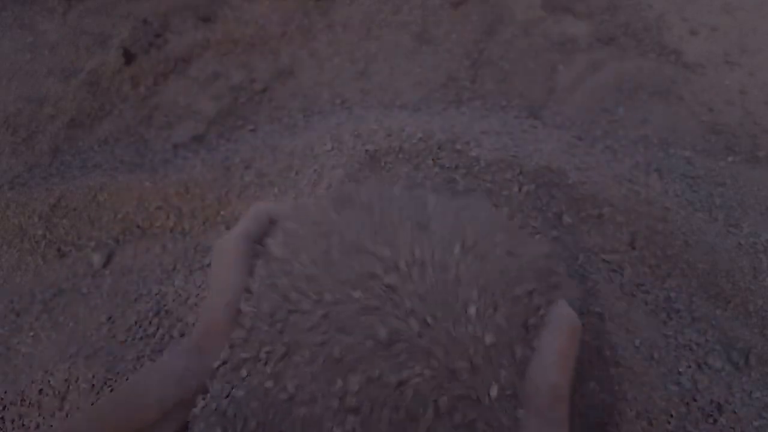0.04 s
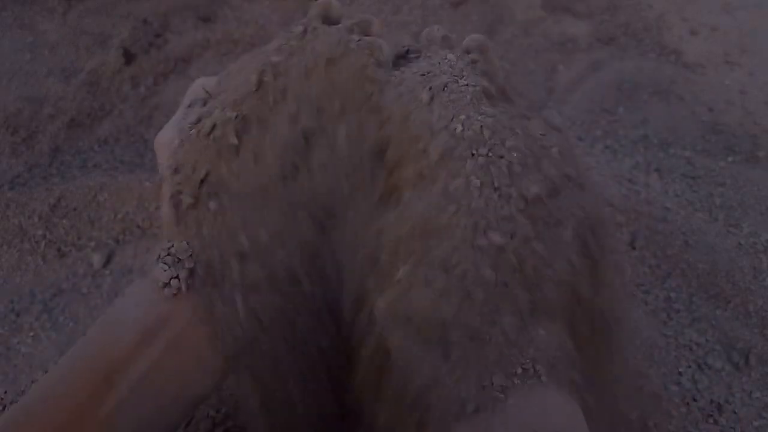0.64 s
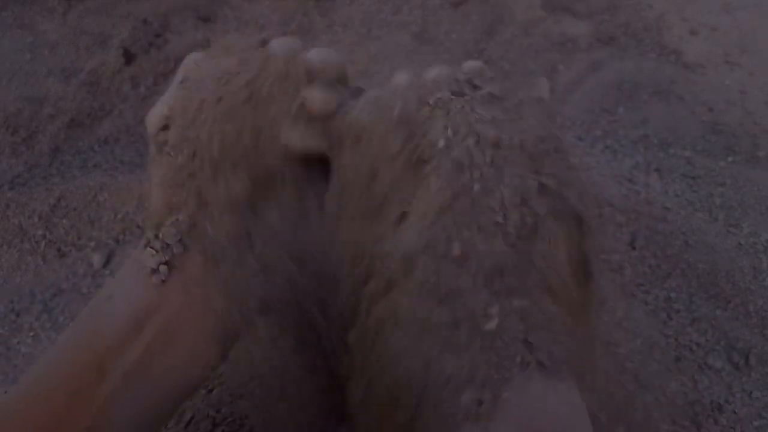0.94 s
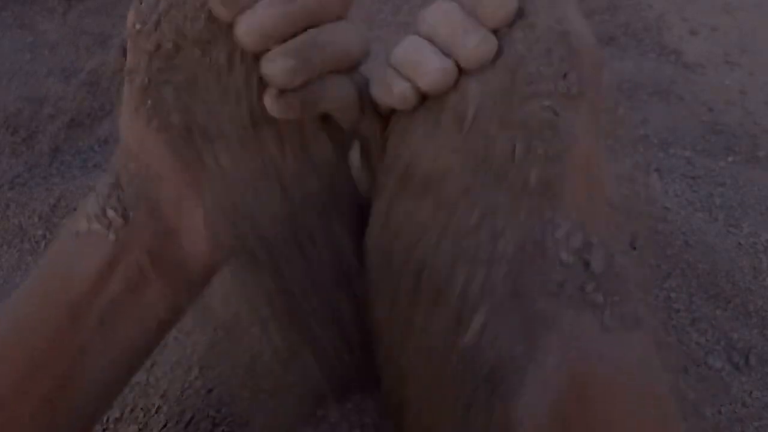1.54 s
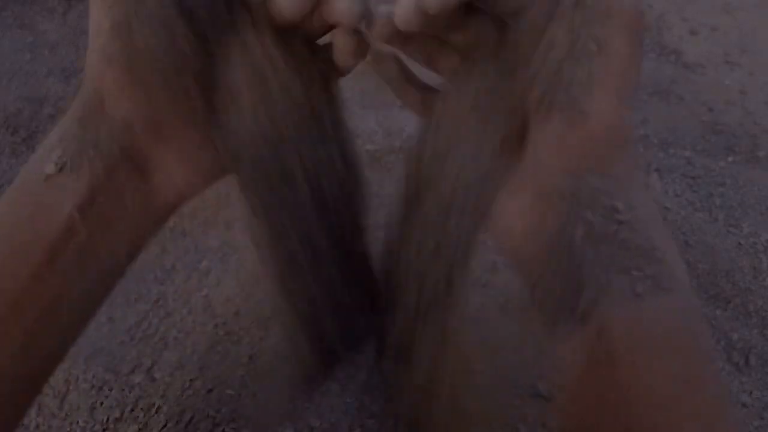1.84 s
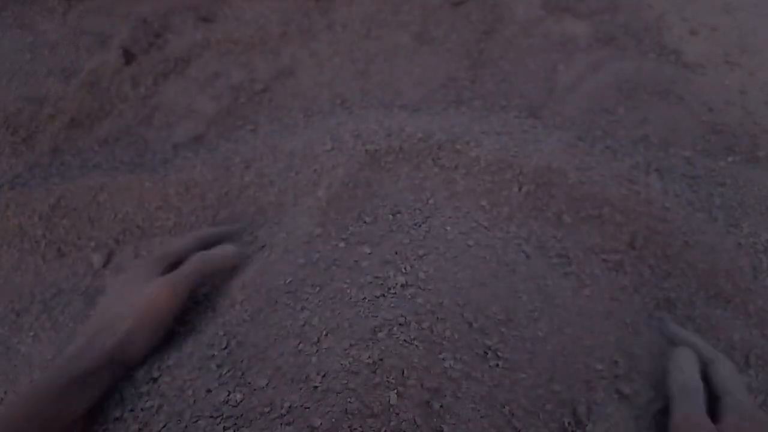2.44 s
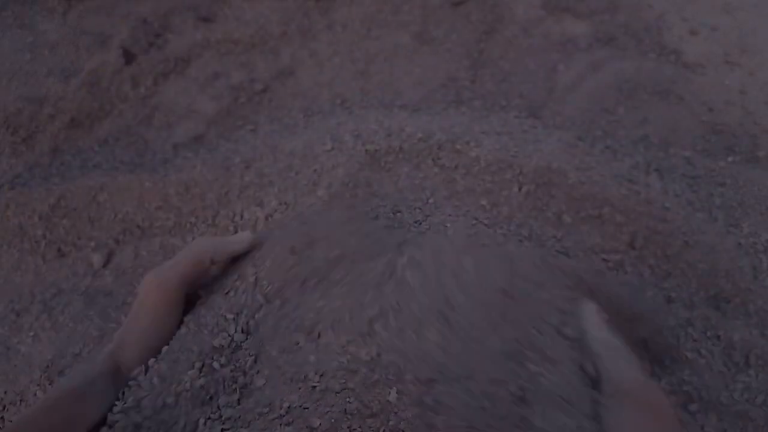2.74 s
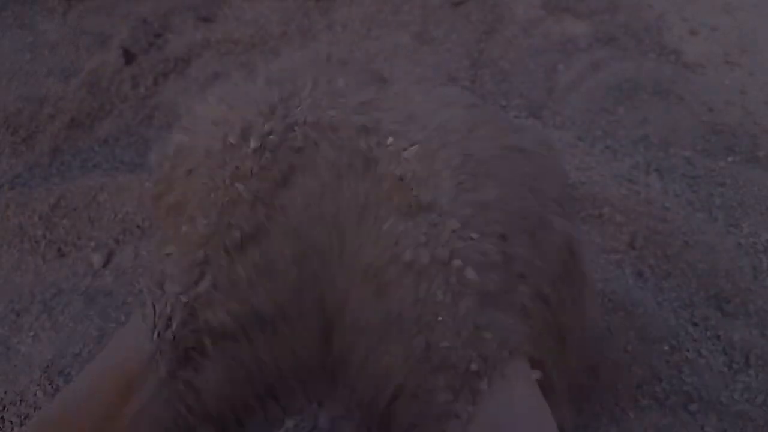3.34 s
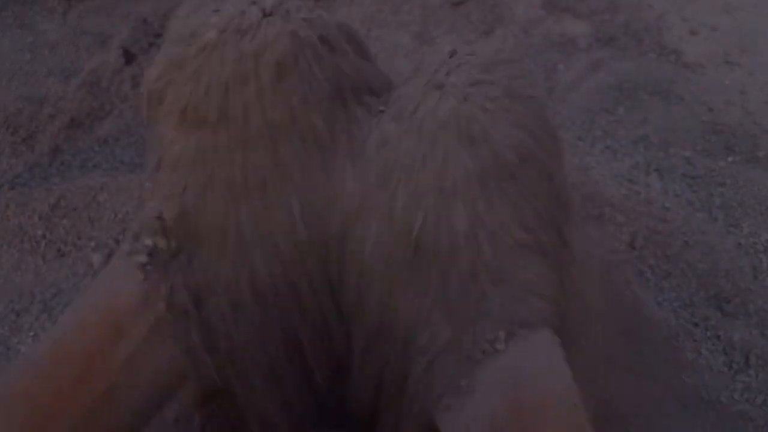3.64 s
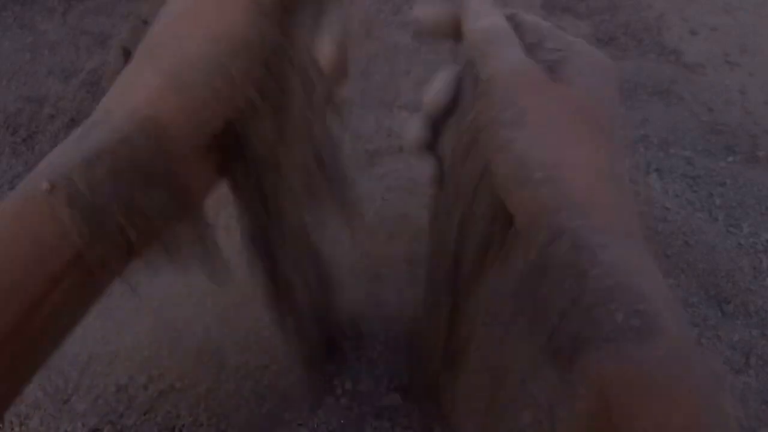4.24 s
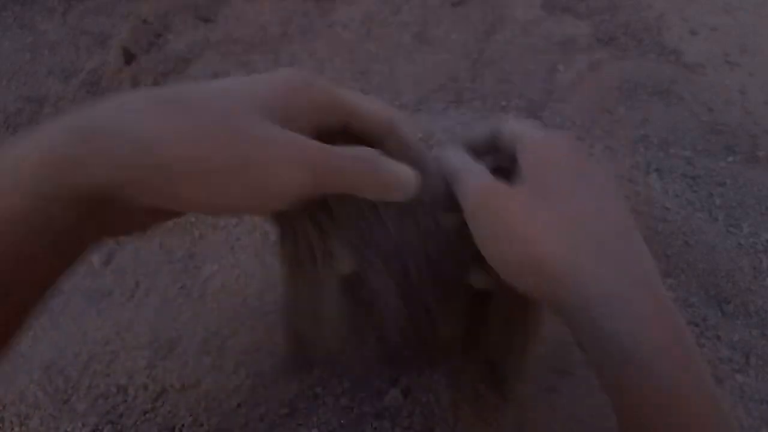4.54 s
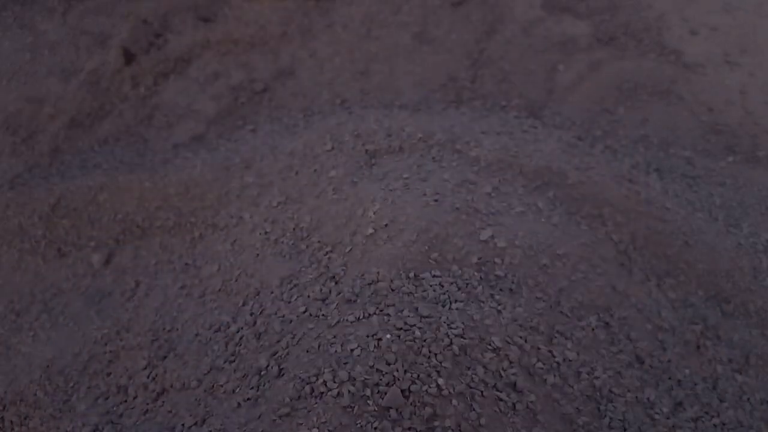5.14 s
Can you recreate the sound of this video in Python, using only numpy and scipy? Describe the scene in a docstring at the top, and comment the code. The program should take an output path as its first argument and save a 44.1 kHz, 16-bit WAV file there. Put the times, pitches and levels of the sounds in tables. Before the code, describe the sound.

Outdoors and close up, hands push into dry, gritty sand with a soft crunch right at the start. From about 0.2 seconds sand streams onto the heap in a fine, crackling hiss that grows until it cuts off near 2.1 seconds. Grains rub over the palms and small stones tick sharply, most clearly around 1.5 seconds. After a brief lull, the fingers dig in again with a firmer crunch from 2.4 to 3 seconds. A second pour starts near 3.2 seconds, peaks around 3.8 with a sharp tick and soft, dull thuds of landing clumps, and trickles out after 4.7. Short sandy scrapes and a light thud follow from 5 to 5.3 seconds. Underneath runs a low wash of distant traffic with faint machine hums. One far engine drones, speeding up and easing off until about 3.3 seconds; another comes in near 3.6 and fades after 5.1.

```python
"""Dry, gritty sand, scooped from a heap by two hands and poured back twice, outdoors and close up.
Falling grains hiss and crackle as many tiny rings; packed sand crunches in small slips under the
fingers and rubs over hollow palms. Small stones tick, and a heavy handful lands with a soft rumble.
Far off, two engines drone and change speed over faint machine hums and a low wash of traffic."""
import sys
import numpy as np
from scipy import signal
from scipy.fft import rfft, irfft
from scipy.io import wavfile

SR = 44100
rng = np.random.default_rng(int(sys.argv[2]) if len(sys.argv) > 2 else 0)


def digitize_waveform(pressure):
    """Quantize a signal to 16-bit integers and store it at the path in sys.argv[1].

    Rows of a 2-D input are taken as channels; values are limited to [-1, 1].
    """
    field = np.atleast_2d(pressure).T
    bounded = np.clip(field, -1, 1)
    quanta = np.round(bounded * 32767).astype(np.int16)
    wavfile.write(sys.argv[1], SR, quanta)


N = 232892
TIME = np.arange(N) / SR
FREQS = np.fft.rfftfreq(N, 1 / SR)

# handfuls streaming out: start/s, end of growth/s, empty/s, level/dB, growth/(dB/s)
POURS = [(0.17, 2.86, 2.082, -46, 3.5), (3.17, 3.837, 4.692, -46.5, 14)]
# fingers pushing into the heap: deepest/s, stop/s, level/dB, brightness/dB, spray level/dB
DIGS = [(0, 0.305, -58.5, -7.5, -59), (2.383, 2.387, -56, -13, -56), (2.476, 3.025, -49, -1, -56.5),
        (5.261, 5.28, -58.5, -9, -50.5)]


def pouring(stream_db, dig_db, spray_db):
    """Fine sand rains on the heap in an uneven hiss; buried hands muffle its top."""
    spectrum = [(2500, -53), (5000, -9.5), (6700, -7.5), (7600, -3), (8600, -6.5), (10000, -2.5),
                (11800, 0), (13500, -4), (15700, -9)]  # hiss: f/Hz, level/dB
    flow_db, (streaming, trickling, *_) = power_sum([stream_db, trickle(), dig_db - 13.5, spray_db])
    poured = streaming + trickling
    pan_db = poured - 3.5 * (1 - poured)
    top_db = 5.5 * poured - 2 * (1 - poured)
    rain = grains(flow_db, peak_per_s=12000, spread_db=3.6, ring_s=0.0002, top_hz=17660,
                  dust_share=0.35, thinning=0.55)
    flutter_db = 0.7 * walk(25)
    hiss = colour(rain, spectrum, band_hz=(8000, 15500))
    body = irfft(rfft(hiss) / (1 + (FREQS / 13000) ** 24), N)
    return (body + (hiss - body) * undb(top_db)) * undb(flow_db + flutter_db) * pan(pan_db)


def stream():
    """Flow in dB from the lifted hands: starts, grows, gushes, cuts off."""
    gushes = [(0.65, 0.11, 3), (1.088, 0.054, -2), (1.298, 0.093, 3), (1.875, 0.076, 4),
              (2.045, 0.062, 4.5), (4.08, 0.12, 1.3), (4.479, 0.043, -2.5)]  # lumps giving way or blocking: t/s, half length/s, flow change/dB
    levels_db = []
    for start_s, full_s, empty_s, db, growth_db_per_s in POURS:
        gate_db = envelope(start_s, empty_s, rise_db_per_s=76, fall_db_per_s=256)
        levels_db.append(db + gate_db - growth_db_per_s * np.maximum(full_s - TIME, 0))
    return power_sum(levels_db)[0] + sum(db * bump(s, half_s) for s, half_s, db in gushes)


def trickle():
    """Flow in dB of the last grains after each stream."""
    return power_sum([db - 11 + envelope(empty_s, empty_s, rise_db_per_s=256, fall_db_per_s=36)
                      for _, _, empty_s, db, _ in POURS])[0]


def digs():
    """Force in dB of each dig: a quick push that eases as the hands fill."""
    return [db + envelope(deepest_s, stop_s, rise_db_per_s=122, sag_db_per_s=6.5, fall_db_per_s=58)
            for deepest_s, stop_s, db, *_ in DIGS]


def spray():
    """Flow in dB of loose sand thrown up by the digs."""
    return power_sum([db + envelope(s, s, rise_db_per_s=133, fall_db_per_s=121)
                      for s, *_, db in DIGS])[0]


def rolling(stream_db, dig_db, spray_db):
    """Coarser grit tumbles with a lower crackle wherever sand moves."""
    spectrum = [(1200, -3.5), (2400, 1), (2950, -1), (3600, 1), (4700, 1.5), (6200, -9), (8000, -7.5),
                (14000, -9)]  # crackle: f/Hz, level/dB
    flow_db, _ = power_sum([stream_db - 10, dig_db - 20.5, spray_db - 3.5])
    crackle = grains(flow_db, peak_per_s=6000, spread_db=3, ring_s=0.00016, top_hz=10500,
                     dust_share=0.5, thinning=0.6)
    flutter_db = 0.6 * walk(30)
    return colour(crackle, spectrum, band_hz=(3200, 6500)) * undb(flow_db + flutter_db)


def crushing(stream_db):
    """Packed sand gives way in many small slips."""
    spectrum = [(150, -21), (350, 7.5), (580, 6.5), (760, -0.5), (1250, 1), (1600, 1), (2000, 0),
                (2500, -3), (3200, -6), (6000, -18)]  # crunch: f/Hz, level/dB
    force_db, bright_db = pressure(stream_db)
    slips = grains(force_db, peak_per_s=3000, spread_db=3, ring_s=0.0004, top_hz=5000,
                   dust_share=0.6, thinning=0.4)
    crunch = colour(slips, spectrum, band_hz=(1050, 1900))
    body = irfft(rfft(crunch) / (1 + (FREQS / 1000) ** 4), N)
    depth_db = 0.37 * (force_db - force_db.max()) - bright_db / 2  # a hard push moves deep sand too
    tilted = body * undb(depth_db) + (crunch - body) * undb(bright_db / 2)
    return tilted * undb(force_db + 1.33 * walk(21))


def pressure(stream_db):
    """Force and brightness in dB of the crunch; it dulls as the fingers sink."""
    squeezes = [(0.316, 0.19, -65, -11), (0.928, 0.099, -63, -9), (1.527, 0.059, -60.5, -14),
                (1.67, 0.14, -59.5, -13), (2.057, 0.077, -58, -6), (3.781, 0.15, -51, -4.5),
                (4.24, 0.1, -59.5, 9), (4.648, 0.13, -60.5, -11)]  # grips on the handful: t/s, half length/s, level/dB, brightness/dB
    dulling_db_per_s = 14
    stream_shear = (stream_db - 15, -7.5)  # force/dB, brightness/dB
    heap_creep = (np.full(N, -68), -1.5)
    parts = [stream_shear, heap_creep]
    for force_db, (deepest_s, stop_s, _, bright_db, _) in zip(digs(), DIGS):
        buried_s = np.clip(TIME, deepest_s, stop_s) - deepest_s
        parts.append((force_db, bright_db - dulling_db_per_s * buried_s))
    for s, half_s, db, bright_db in squeezes:
        parts.append((db + 10 * np.log10(bump(s, half_s) + 1e-12), bright_db))
    force_db, shares = power_sum([db for db, _ in parts])
    return force_db, sum(share * bright_db for share, (_, bright_db) in zip(shares, parts))


def grains(flow_db, peak_per_s, spread_db, ring_s, top_hz, dust_share, thinning):
    """Tiny collisions, each a short ring of its own pitch, size and place, over a hiss of dust."""
    draw = np.random.default_rng(rng.integers(2 ** 31)).random((int(peak_per_s * N / SR), 7))
    start = (draw[:, 0] * N).astype(int)
    density = undb(thinning * (flow_db - flow_db.max()))  # thin flow: fewer hits, each stands out
    hit = draw[:, 1] < density[start]
    start = start[hit]
    pitch, weight, place, *phases = draw[hit, 2:].T
    size = undb(-spread_db * np.log(weight + 0.012)) / np.sqrt(density[start])
    hz = pitch[:, None] * top_hz
    age = np.arange(64)
    index = (start[:, None] + age).ravel()
    channels = []
    for phase, gain in zip(phases, pan(10 * (place - 0.5))):
        ring = np.exp(-age / SR / ring_s) * np.sin(2 * np.pi * (hz * age / SR + phase[:, None]))
        channels.append(np.bincount(index, (ring * (size * gain)[:, None]).ravel(), N)[:N])
    clicks = np.array(channels) / np.std(channels) * np.sqrt(2 * top_hz / SR)
    return np.sqrt(1 - dust_share) * clicks + np.sqrt(dust_share) * rng.standard_normal((2, N))


def rubbing():
    """Sand slides fitfully over a cupped hand; the hollow's resonance shifts as the fingers move."""
    rubs = [(0.007, 0.1, 1.1, 2300, 340, -59), (0.12, 0.22, 0.62, 945, 110, -55),
            (0.14, 0.28, 0.9, 4600, 1200, -64), (0.83, 0.91, 1.06, 920, 450, -52),
            (0.84, 0.91, 1.02, 1900, 1100, -56.5), (0.98, 1.1, 1.3, 1100, 1100, -56),
            (1.44, 1.52, 1.85, 1100, 600, -56.5), (1.47, 1.508, 1.58, 2020, 400, -53.5),
            (2.344, 2.39, 2.56, 3840, 1490, -60.5), (2.42, 2.5, 2.72, 1370, 450, -49.5),
            (2.98, 3.04, 3.13, 2400, 900, -62), (2.99, 3.08, 3.45, 4820, 2200, -63),
            (3.66, 3.81, 3.92, 1120, 400, -51.5), (3.63, 3.76, 3.88, 2100, 700, -57.5),
            (4.14, 4.27, 4.4, 1600, 500, -52.5), (5.008, 5.025, 5.17, 2680, 500, -56.5),
            (5.01, 5.04, 5.11, 3800, 1200, -65), (5.0, 5.03, 5.14, 1550, 800, -58.5),
            (5.185, 5.26, 5.32, 1500, 1000, -53)]  # slides on skin: start/s, peak/s, end/s, f/Hz, bandwidth/Hz, level/dB
    out = np.zeros((2, N))
    for start_s, peak_s, end_s, hz, width_hz, db in rubs:
        hollow = 1 / (1 + ((FREQS - hz) / (width_hz / 2)) ** 2)
        rub = widen(rng.standard_normal((2, N)), hollow)
        drift_hz = hz * 0.02 * walk(7.4)
        shifted = (signal.hilbert(rub) * np.exp(1j * phase_rad(drift_hz))).real
        swell = np.interp(TIME, [start_s, peak_s, end_s], [0, 1, 0]) ** 0.65
        grip_db = 1.8 * walk(18)
        out += shifted / rub.std() * swell * undb(db + grip_db)
    return out


def landing():
    """A heavy handful patters onto the soft heap as a dull rumble; whole clumps thud."""
    spectrum = [(35, -40), (70, -4), (108, 8.5), (160, 0.5), (300, -7), (600, -23.5), (1500, -39)]  # thud: f/Hz, level/dB
    clumps = [(3.66, 0.042, -43), (3.887, 0.056, -39), (4.026, 0.057, -42), (4.202, 0.042, -42),
              (5.035, 0.036, -46.5)]  # clump impacts: t/s, half length/s, level/dB
    patter_db = -40 + envelope(top_s=3.78, stop_s=4.14, rise_db_per_s=40, fall_db_per_s=41)
    mass = undb(patter_db) + sum(undb(db) * bump(s, half_s) for s, half_s, db in clumps)
    return colour(rng.standard_normal((2, N)), spectrum, band_hz=(50, 400)) * mass


def stones():
    """Small stones crack together and ring briefly; bigger ones crack lower."""
    # strikes: t/s, level/dB, ring f/Hz, ring re crack/dB, decay/s, crack high-pass/Hz, L-R/dB
    strikes = [(0.0548, -31, 11600, -5, 0.0017, 5500, 8), (0.117, -47, 11600, -8, .001, 4000, 4),
               (.145, -40, 4700, -8, 0.0015, 3000, 5), (.150, -39, 12100, -3, 0.0027, 3500, 4),
               (.216, -33, 11100, -6, 0.0014, 4500, 6), (0.321, -32, 11900, -6, 0.0012, 6500, 6),
               (0.695, -30.5, 12100, -6, .001, 7000, 5), (0.935, -28, 11900, -6, 0.0006, 10500, 3),
               (1.208, -29.5, 12700, -6, 0.0009, 8500, 3), (1.4596, -20, 14540, -7, 0.001, 9500, 4),
               (1.777, -28, 12150, -6, .0008, 10000, 5), (2.153, -39.5, 11230, -6, 0.0018, 4000, 0),
               (2.922, -36.5, 14840, -6, 0.0012, 7000, 6), (3.03, -48, 4700, 4, 0.0015, 3000, 2),
               (3.1157, -36.5, 4490, -5, 0.001, 3000, 6), (3.14, -36, 11900, -4, .0011, 5000, 7),
               (3.1905, -33, 10900, -7, 0.0014, 4000, 8), (3.236, -34, 12000, -5, .001, 5000, 5),
               (3.399, -32, 11430, -7, .001, 4000, 6), (3.544, -28, 12000, -5, 0.0009, 4000, 6),
               (3.773, -19.5, 10600, -7, 0.0013, 11000, 4), (3.979, -29.5, 12000, -6, .0008, 7000, 0),
               (4.096, -26.5, 13500, -6, .0008, 8500, 1), (4.141, -28.5, 11500, -6, .0008, 8500, 1)]
    out = np.zeros((2, N))
    age_s = np.arange(SR // 50) / SR
    for s, db, hz, ring_db, decay_s, edge_hz, pan_db in strikes:
        highpass = signal.butter(3, edge_hz, "high", fs=SR, output="sos")
        crack = signal.sosfilt(highpass, rng.standard_normal((2, len(age_s))))
        ring = np.sin(2 * np.pi * (hz * age_s + rng.random((2, 1)) / 4))
        tick = (crack + ring * undb(ring_db)) * np.exp(-age_s / decay_s)
        start = int(s * SR)
        out[:, start:start + len(age_s)] += tick * undb(db) * pan(pan_db)
    return out


def engine():
    """A far exhaust speeds up and eases off; neighbouring orders beat at the cycle rate and throb."""
    run = [(0.1, 22.87, -62, -22.5), (0.48, 24.67, -47, -26.5), (0.56, 25.9, -69, -23),
           (0.72, 26.28, -35.5, -24), (1.09, 28.12, -35, -36), (1.13, 27.93, -30, -44),
           (1.27, 28.4, -26, -37), (1.44, 28.35, -42.5, -40), (1.68, 29.22, -31.5, -41.5),
           (1.88, 29.7, -37, -39), (1.95, 29.15, -37, -54.5), (2.0, 28.76, -36, -39.5),
           (2.14, 26.23, -42, -41.5), (2.3, 28.67, -28.5, -50), (2.35, 28.9, -36, -48), (2.4, 29, -31, -65),
           (2.45, 28.27, -34, -44), (2.79, 27.3, -39, -48), (2.89, 27.37, -31, -61), (2.99, 26, -52, -54),
           (3.07, 26.23, -38, -41), (3.25, 26.6, -49, -60)]  # engine under load: t/s, cycle rate/Hz, 4th order/dB, 5th order/dB
    weak_orders = [(7, -29), (8, -30), (9, -25), (10, -27.5), (11, -24.5), (12, -31.5), (14, -33)]  # overtones: multiple of cycle rate, level re effort/dB
    times_s, *columns = np.transpose(run)
    hz, fourth_db, fifth_db = [np.interp(TIME, times_s, column) for column in columns]
    phase = phase_rad(hz * (1 + 0.0096 * walk(34)))
    strong = tone(4 * phase, fourth_db, waver_db=2) + tone(5 * phase, fifth_db, waver_db=-1.1)
    effort_db = 20 * np.log10(undb(fifth_db) + 0.5 * undb(fourth_db))
    sixth_db = effort_db - 23.5 - 4.2 * (hz - hz.mean())  # booms less as it climbs out of the bass
    sixth = tone(6 * phase + 2 * np.pi * rng.random(), sixth_db, waver_db=-2)
    weak = sum(tone(k * phase + 2 * np.pi * rng.random(), effort_db + db, waver_db=2)
               for k, db in weak_orders)
    fade = np.exp(-np.maximum(TIME - times_s[-1], 0) / 0.17)
    return (strong + sixth + weak) * fade * pan(1)


def idling():
    """A second engine comes up, gains a little speed and fades."""
    orders = [(1, 1), (1.5, -12), (2, -26), (2.5, -14.5), (3, -16), (3.5, -15), (5, -21.5)]  # partials: multiple of firing rate, level/dB
    up_s, off_s, creep_hz_per_s = 3.66, 5.09, 2.4
    firing_hz = 73.57 + creep_hz_per_s * np.maximum(TIME - up_s, 0)
    swell_db = envelope(up_s, off_s, rise_db_per_s=67, sag_db_per_s=3, fall_db_per_s=41)
    db = -37.5 + swell_db + 2.1 * walk(8.6)
    phase = phase_rad(firing_hz * (1 + 0.0038 * walk(25)))
    return sum(tone(k * phase, db + order_db, waver_db=0.5 * k) for k, order_db in orders) * pan(0.56)


def humming():
    """Thin machine tones drift in and out of hearing."""
    hums = [(0.1, 1.33, 270, -51.5), (1.65, 3.1, 247, -50), (1.43, 2.955, 385, -58), (1.6, 3.7, 848, -70.5)]  # machine tones: start/s, end/s, f/Hz, level/dB
    fade_s = 0.15
    out = 0
    for start_s, end_s, hz, db in hums:
        phase = phase_rad(hz * (1 + 0.003 * walk(7)))
        swell = np.interp(TIME, [start_s, start_s + fade_s, end_s - fade_s, end_s], [0, 1, 1, 0])
        out += tone(phase, db, waver_db=2) * swell
    return out


def rumble():
    """The low wash of distant machines and traffic swells, lulls and slowly recedes."""
    spectrum = [(25, -7), (40, -28), (64, 5), (85, 1), (130, 4), (185, 1), (250, 1.5), (310, -6.5),
                (390, -8), (500, -15), (700, -24.5), (860, -21), (1300, -37), (3000, -55)]  # wash: f/Hz, level/dB
    lulls = [(2.26, 0.15, -2), (4.93, 0.16, -1)]  # dips in the wash: t/s, half length/s, level change/dB
    db = -43.5 - 0.5 * TIME + 1.68 * walk(1.7)
    lull_db = sum(change_db * bump(s, half_s) for s, half_s, change_db in lulls)
    return colour(rng.standard_normal((2, N)), spectrum, band_hz=(170, 450)) * undb(db + lull_db)


def tone(phase, db, waver_db):
    """A far tone of rms level db that the air makes waver."""
    return np.sqrt(2) * np.sin(phase) * undb(db + waver_db * walk(14.7))


def phase_rad(hz):
    """Running phase of a varying frequency."""
    return 2 * np.pi * np.cumsum(hz) / SR


def colour(pair, spectrum, band_hz):
    """Shape two unrelated white signals; the mid has rms 1 within the band."""
    gain = response(spectrum)
    inside = (FREQS > band_hz[0]) & (FREQS < band_hz[1])
    return widen(pair, gain / np.sqrt(np.mean(gain ** 2 * inside) * 2))


def widen(pair, gain):
    """Filter two unrelated signals and blend them to the microphone pair's stereo width."""
    width = [(60, -5.5), (130, -13), (260, -11), (500, -5.5), (1000, 0), (2000, -1.5), (4000, 0.4),
             (6500, 3), (9000, 0), (15000, 0)]  # stereo width: f/Hz, side re mid/dB
    mid = irfft(rfft(pair[0] + pair[1]) * gain, N)
    side = irfft(rfft(pair[0] - pair[1]) * gain * response(width), N)
    return np.array([mid + side, mid - side])


def response(points):
    """Gain per FFT bin from (f/Hz, level/dB) points."""
    hz, db = np.transpose(points)
    return undb(np.interp(np.log(FREQS + 1), np.log(hz), db))


def envelope(top_s, stop_s, rise_db_per_s, fall_db_per_s, sag_db_per_s=0):
    """Level in dB: rises to 0 at top_s, sags until stop_s, then falls."""
    before_s = np.maximum(top_s - TIME, 0)
    held_s = np.maximum(np.minimum(TIME, stop_s) - top_s, 0)
    after_s = np.maximum(TIME - stop_s, 0)
    return -rise_db_per_s * before_s - sag_db_per_s * held_s - fall_db_per_s * after_s


def bump(s, half_s):
    """Gaussian swell, peak 1."""
    return np.exp(-((TIME - s) / half_s) ** 2)


def walk(rate_hz):
    """Unit-spread random drift, low-passed at rate_hz."""
    count = 2048
    drift = irfft(rfft(rng.standard_normal(count)) / (1 + (FREQS[:count // 2 + 1] / rate_hz) ** 4))
    return np.interp(TIME, np.linspace(0, N / SR, count), drift / drift.std())


def power_sum(levels_db):
    """Joint level in dB and each part's share of the power."""
    power = undb(levels_db) ** 2 + 1e-12
    return 10 * np.log10(power.sum(0)), power / power.sum(0)


def pan(pan_db):
    """Left and right gains for an L-R level difference."""
    return undb(np.array([[1], [-1]]) * pan_db / 2)


def undb(db):
    """Decibels to gain."""
    return 10 ** (np.asarray(db) / 20)


def scene():
    """Sand close by, engines far behind."""
    stream_db, dig_db, spray_db = stream(), power_sum(digs())[0], spray()
    loose = pouring(stream_db, dig_db, spray_db) + rolling(stream_db, dig_db, spray_db)
    sand = loose + crushing(stream_db) + rubbing() + landing() + stones()
    return sand + engine() + idling() + humming() + rumble()


def record(dry):
    """Each microphone port colours the treble its own way; deep bass and top are cut."""
    ports = [(2000, 0), (5000, -0.5), (7600, -1.5), (9500, -1), (11800, 0.5), (13300, 0.5), (15500, 7)]  # port mismatch: f/Hz, L-R/dB
    bass_hz, top_hz, fade_in_s = 42, 15800, 0.0015
    tilt = np.sqrt(response(ports))
    lowpass = 1 / np.sqrt(1 + (FREQS / top_hz) ** 300)
    highpass = FREQS ** 2 / np.sqrt(FREQS ** 4 + bass_hz ** 4)
    faded = dry * np.minimum(TIME / fade_in_s, 1)
    return irfft(rfft(faded) * np.array([tilt, 1 / tilt]) * lowpass * highpass, N)


dry = scene()
out = record(dry)
digitize_waveform(out)
```